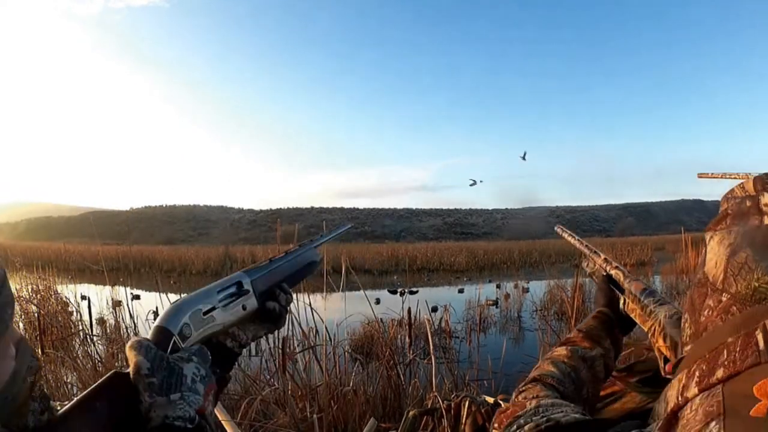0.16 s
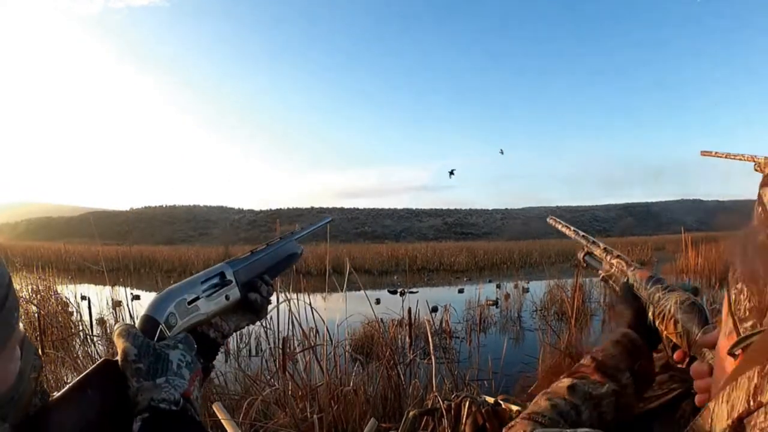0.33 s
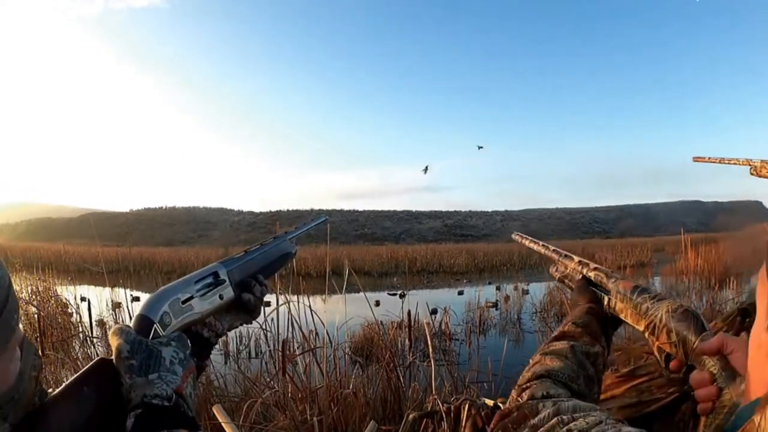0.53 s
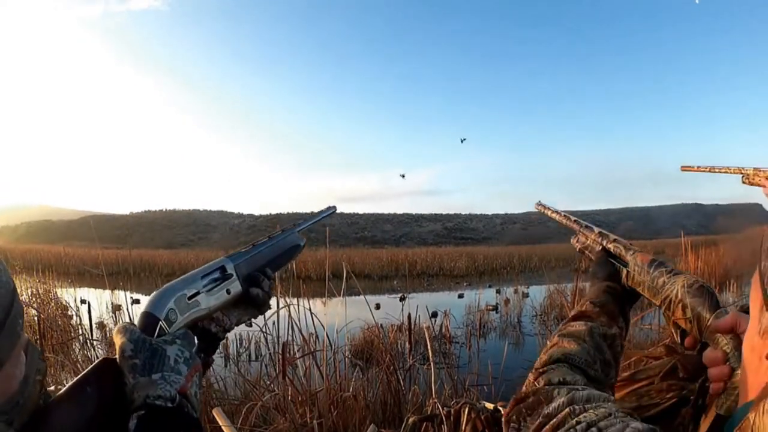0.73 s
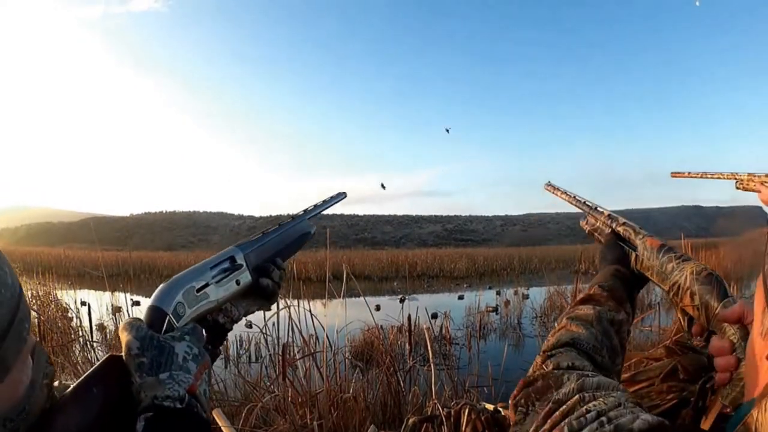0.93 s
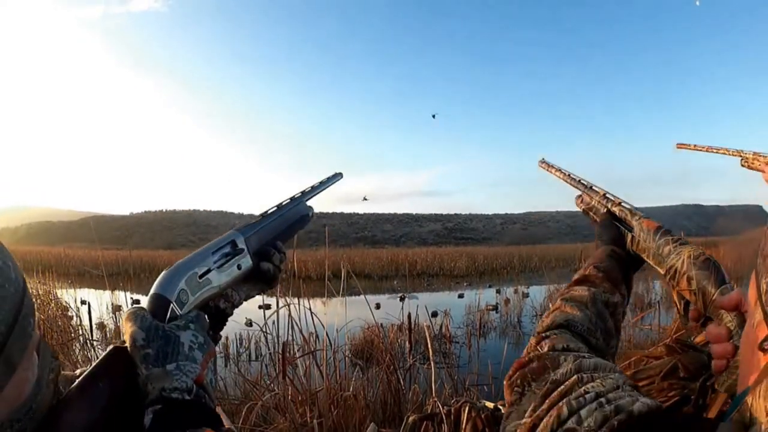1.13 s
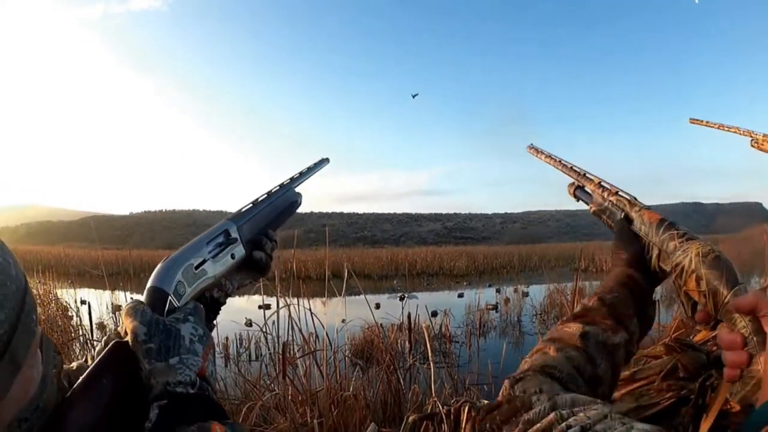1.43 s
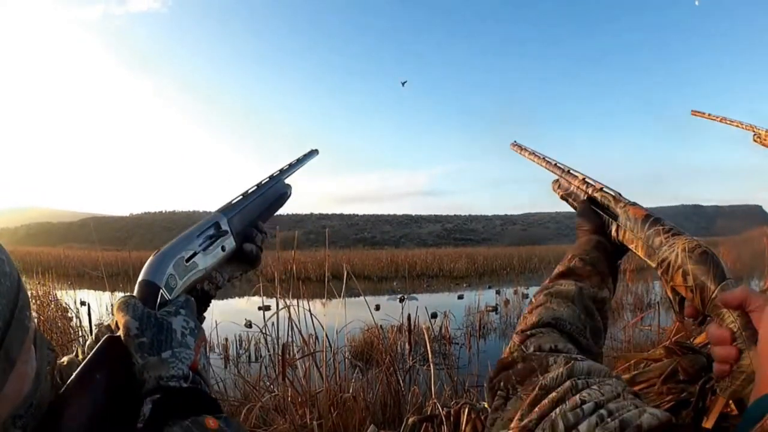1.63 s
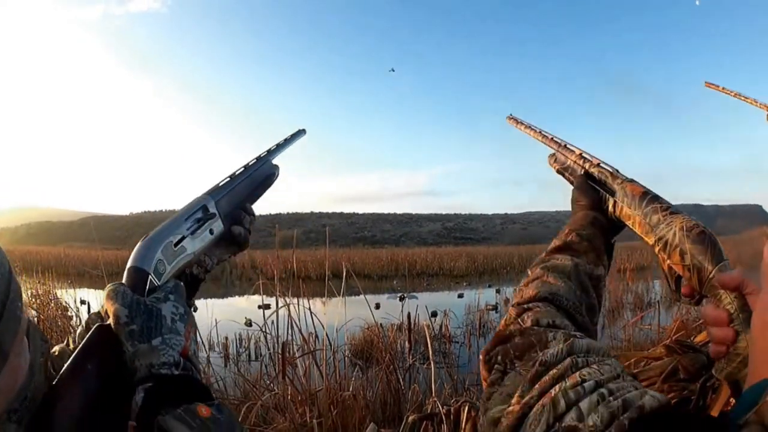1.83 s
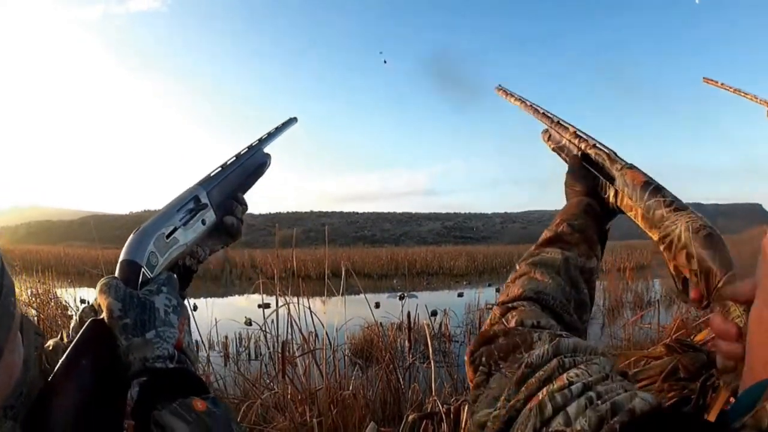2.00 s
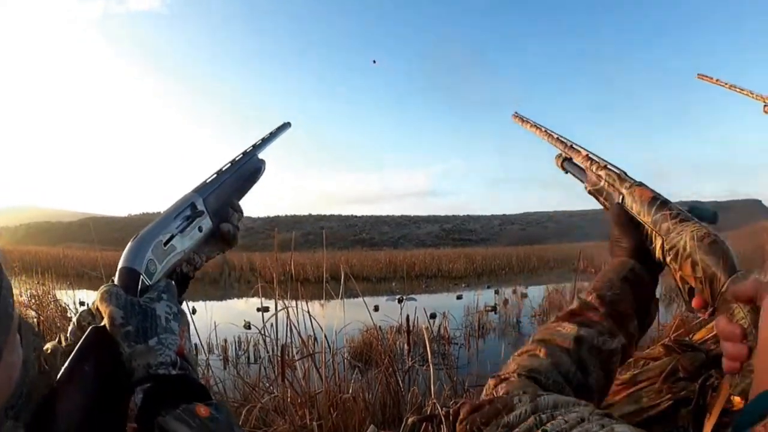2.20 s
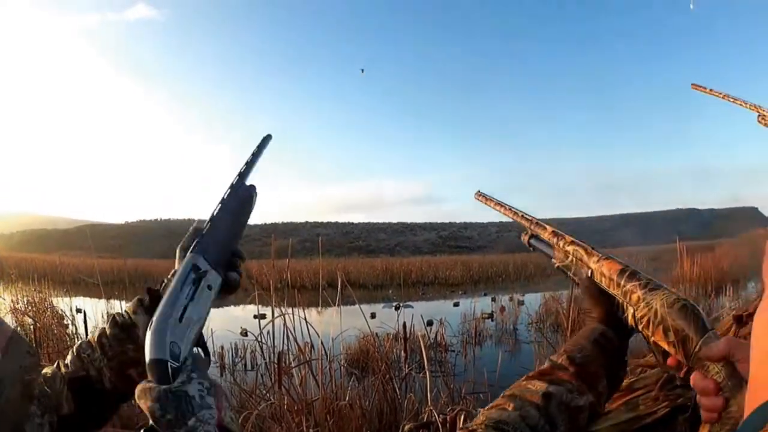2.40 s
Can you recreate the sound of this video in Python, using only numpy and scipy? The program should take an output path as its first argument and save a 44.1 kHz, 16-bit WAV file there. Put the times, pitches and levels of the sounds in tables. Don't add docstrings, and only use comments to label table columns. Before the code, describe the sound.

Loud close shotgun blasts in three bursts, metallic action clicks between, echoes rolling over open marsh

```python
import sys
import numpy as np
from scipy import signal
from scipy.io import wavfile
from scipy.ndimage import uniform_filter1d

SR = 44100
rng = np.random.default_rng(int(sys.argv[2]) if len(sys.argv) > 2 else 0)


def boost_factor(decibels):
    exponent = np.asarray(decibels, float) / 20
    return 10 ** exponent


def generate_wav(sig):
    pcm = np.round(np.clip(np.atleast_2d(sig).T, -1, 1) * 32767).astype(np.int16)
    wavfile.write(sys.argv[1], SR, pcm)


N = 112454

# f/Hz, level/dB
PORT_COLOUR = [(30, 3), (2000, 5.5), (3900, 7), (4800, 3), (5600, -9), (7000, -9.5), (8800, -6.5),
               (11000, -5.5)]
# f/Hz, left over right/dB
LEAN = [(60, -0.5), (250, 2.5), (600, 5), (1100, 5.5), (2200, 4), (3900, 16.5), (5200, -3), (9000, 5)]
# f/Hz, likeness/0..1
LIKENESS = [(60, 0.95), (140, 0.79), (340, 0.91), (800, 1), (1910, 0.43), (4530, 0.1144)]

# f/Hz, level/dB
AIR_COLOUR = [(40, 1.5), (200, 0.5), (400, -0.5), (1000, -11.5), (4000, -16), (9000, -13.5), (14000, -35)]
AIR_DB = -50.5
# t/s, slap level/dB, roll level/dB, roll rise/s, roll tilt/dB per octave
ECHOES = [
    (-.03, -48, -63, .02, 1),
    (.31, -28.5, -29.5, 0.015, 2.5),
    (0.369, -13.5, -18, 0.13, 0.5),
    (.885, -64, -42.5, 0.016, -17),
    (0.871, -62, -25.5, 0.44, 2),
    (1.351, -13.5, -19.5, 0.098, 0),
    (1.774, -24, -28, 0.17, 3.5),
    (1.881, -15.5, -23, 0.15, -7),
    (2.178, -17.5, -22, 0.14, 1),
]
# f/Hz, level/dB
ROLL_COLOUR = [(40, -58), (130, -17), (230, -7.5), (400, -2), (800, -8.5), (1700, -15.5), (4000, -13),
               (9000, -49)]
# f/Hz, time/s
ROLL_T60 = [(150, 4.2), (400, 3.54), (1000, 2.13), (4000, 1.07), (9000, 1.1)]
ROLL_PATCH_DB = 2.0
SINK_DB, SINK_FROM_HZ, SINK_TO_HZ, SINK_S, SINK_OCTAVES = 5, 1160, 277, 0.22, 0.67

# t/s, level/dB, f/Hz
HILLS = [(0.576, -16.5, 477), (.62, -23.5, 519), (.69, -16.5, 436), (0.716, -19.5, 437), (.655, -22.5, 334),
         (0.744, -24.5, 299), (.79, -22, 394), (0.829, -24, 326), (.888, -13, 317), (.889, -16, 473),
         (0.904, -25, 213), (.906, -17.5, 419), (0.92, -19.5, 364), (.935, -22, 290), (0.951, -24.5, 214),
         (.965, -20.5, 196), (0.978, -22, 324), (.985, -31, 190), (1.008, -20, 431), (2.329, -18, 500)]
HILL_RISE_S, HILL_FALL_S, HILL_WASH_DB, HILL_WASH_S = 0.003, 0.011, -11.5, 0.021

# f/Hz, level/dB
SLAP_COLOUR = [(100, -35), (300, -18.5), (800, 3), (1600, -5.5), (4000, -3), (9000, -6), (11200, -18),
               (12600, -46.5)]
# f/Hz, time/s
SLAP_T60 = [(200, 1), (1000, 0.86), (3500, 0.6), (9000, 0.3), (14000, .3)]
SLAP_HOLD_S, SLAP_RISE_S, SLAP_PATCH_DB, SLAP_FLICKER_DB = 0.026, 0.01, 1.5, 1.6

# t/s, length/s, level/dB
RATTLES = [(-.06, 0.28, -46.5), (0.423, 0.27, -31), (0.54, 0.054, -24), (0.545, 0.23, -46),
           (1.467, 0.13, -30.5), (1.548, 0.052, -17), (1.574, 0.046, -39), (1.93, 0.3, -43.5),
           (2.241, 0.038, -22.5), (2.276, 0.23, -45.5), (2.372, 0.24, -43.5)]
# f/Hz, level/dB
RATTLE_COLOUR = [(300, -7), (1500, -6.5), (4000, 3.5), (6500, 1.5), (9000, 5), (10800, -4), (12000, -39)]
RATTLE_GRAIN_DB = 2.5

# t/s, level/dB, top-octave level/dB
TICKS = [(.2775, -10.5, 1), (.528, -22, -22), (1.2785, -9.5, -0.5), (1.3595, -18, -20),
         (1.3875, -10.5, -15), (1.463, -28, -20), (1.545, -16, -19), (1.5565, -11, 0.5), (1.565, -15, 5.5),
         (1.5725, -12.5, 3.5), (2.083, -17, -2.5), (2.2205, -19, -20), (2.2455, -20, -19),
         (2.2585, -1.5, 1), (2.285, -35, -20)]
# f/Hz, level/dB
TICK_COLOUR = [(800, -16.5), (2500, -4), (4000, 5.5), (9000, 7.5), (12000, 3)]
# f/Hz, level/dB
TICK_TOP = [(13000, -7), (15000, -19.5), (19000, -16.5)]
TICK_S, TICK_RING_HZ, TICK_RING_DB, TICK_RING_S = 0.0015, 8300, -22, 0.003

# t/s, ring level/dB, ring f/Hz, snap level/dB
CLICKS = [(0.304, 3, 3860, -8.5), (0.326, 5, 2700, -17), (.392, -6, 3730, -14), (0.417, -4, 3730, -14.5),
          (.552, -9.5, 4000, -12), (.560, -15.5, 3500, -13.5), (1.278, 6.5, 3050, -4),
          (1.29, -2, 3910, -21), (1.371, -3, 3940, -10), (1.388, -1.5, 4180, -4.5), (1.410, -5, 3850, -9.5),
          (1.478, -32, 3970, -23), (1.497, -29, 4100, -13), (1.529, -26, 1990, -22),
          (1.558, -21, 3370, -13), (1.5646, -5, 1810, -5), (1.573, 0.5, 1710, -5), (1.665, -6.5, 4130, -27),
          (1.675, -2, 3800, -16), (1.692, 6.5, 3300, -4), (1.715, -7, 1380, -30), (1.809, 0, 3570, -13.5),
          (2.076, -5, 4000, -20), (2.080, 3, 3940, -5), (2.084, -2, 4080, -20), (2.092, -22, 4000, -22),
          (2.1052, -0.5, 3220, -14), (2.171, -7.5, 1460, -27), (2.199, -4, 3740, -27.5),
          (2.21, -9, 3870, -18), (2.2579, -1.5, 3960, -7), (2.2598, -1.5, 2820, -18)]
# f/Hz, level/dB, fade by 60 dB/s
ACTION_MODES = [(1410, -25, 0.022), (2920, -18, 0.014), (4060, -27.5, 0.0081), (8700, -41.5, .025)]
# f/Hz, level/dB
SNAP_COLOUR = [(300, -3.5), (1500, 8), (4000, -3), (9000, 9), (11500, -5), (13000, -38)]
SNAP_S, SNAP_TAIL_DB, SNAP_TAIL_S = 0.0017, -19, 0.0041
CLICK_T60_S, CLICK_RISE_S, RING_SPREAD = 0.012, 0.00072, 0.13

# t/s, level/dB, f/Hz, decay/s, push level/dB
BOOMS = [
    (0.231, -2.5, 156.2, 0.026, -9.5),
    (0.2543, 3, 203, 0.0069, -8.5),
    (0.283, -1, 174.4, 0.0055, -0.5),
    (1.2307, -0.5, 178, 0.013, -3.5),
    (1.6408, 12, 166.2, 0.0087, 1),
    (1.758, 2, 188.8, 0.0077, 5),
    (2.0591, -1.5, 174.8, 0.0083, -35.5),
    (0.307, -20.5, 159, 0.014, -3.5),
]
BOOM_GLIDE, BOOM_GLIDE_S, BOOM_ROUGH_DB, BOOM_LIKENESS = 0.934, 0.0034, -6.5, 0.82
BOOM_UPPER, BOOM_UPPER_DB = 1.625, -3
BOOM_LOWER, BOOM_LOWER_DB = 0.69, -5
PUSH_S, KNOCK_HZ, KNOCK_DB, KNOCK_S = 0.018, 682, -8.5, 0.0059

# t/s, level/dB, hold/s, hiss level/dB, rise/s
CRACKS = [
    (0.223, 4.5, 0.011, -1, 0.0015),
    (0.256, 0, 0.0027, -6, 0.00062),
    (0.277, -2, 0.0034, -5, 0.00084),
    (1.223, 3.5, 0.0084, -2.5, 0.0027),
    (1.6413, 3, 0.0081, -2.5, .0005),
    (1.757, 5, 0.002, -5.5, 0.0017),
    (2.047, 1.5, 0.013, -5.5, 0.0016),
]
# f/Hz, level/dB
CRACK_COLOUR = [(100, -12), (700, 3.5), (2000, 1), (5000, 4), (9000, 6.5), (14500, -6.5), (17000, -10.5)]
# f/Hz, level/dB
HISS_COLOUR = [(100, 4), (300, -3.5), (1000, -2.5), (2500, -3.5), (4000, -2), (9000, -1), (11500, -17),
               (14000, -47)]
PRE_ROLL_S, LEAD_DB, LEAD_S, CRACK_FALL_S = 0.01, -22.5, 0.004, 0.0044
HISS_RISE_S, HISS_FALL_S, HISS_LUMP_DB = 0.00528, 0.04, 2.5


def evened(x):
    return x / np.sqrt(np.mean(x ** 2) + 1e-20)


def read(points, hz):
    f, value = np.transpose(points)
    return np.interp(np.log(hz + 1), np.log(f + 1), value)


def add(mix, s, sound):
    part = mix[..., round(s * SR):][..., :sound.shape[-1]]
    part += sound[..., :part.shape[-1]]


def pan(left_db, right_db):
    return boost_factor(np.array([[left_db], [right_db]]))


def lumps(frames, size, count):
    noise = rng.standard_normal((frames, size)).T
    across_bins = uniform_filter1d(noise, size=6, axis=0)
    return evened(uniform_filter1d(across_bins, size=count, axis=1))


def shape(points, size=256):
    hz = np.fft.rfftfreq(size, 1 / SR)
    colour = boost_factor(read(points, hz) + read(PORT_COLOUR, hz)) * (hz > 0)
    return evened(colour)[:, None] / np.sqrt(size)


def ports(size, count):
    order = 2 * len(size) - 2
    hz = np.fft.rfftfreq(order, 1 / SR)
    a, b, c, d = rng.standard_normal((size.shape[1], len(hz), 4)).T
    same = np.clip(read(LIKENESS, hz), -1, 1)[:, None]
    lean = boost_factor(read(LEAN, hz)[:, None] / 2)
    shared, own = a + 1j * b, c + 1j * d
    z = np.array([shared * lean, (same * shared + np.sqrt(1 - same ** 2) * own) / lean])
    return signal.istft(z * size, nperseg=order, noverlap=order - order // 4)[1][:, :count]


def band(x, order, low_hz, high_hz):
    return signal.sosfilt(signal.butter(order, [low_hz, high_hz], "band", fs=SR, output="sos"), x)


def thud(count, low_hz, high_hz):
    a, b = rng.standard_normal((count, 2)).T
    right = BOOM_LIKENESS * a + np.sqrt(1 - BOOM_LIKENESS ** 2) * b
    return evened(band(np.array([a, right]), 2, low_hz, high_hz))


def marsh():
    frames, hz = N // 256 + 5, np.fft.rfftfreq(1024, 1 / SR)[:, None]
    t = np.arange(frames) * 256 / SR
    power = (boost_factor(AIR_DB) * shape(AIR_COLOUR, size=1024)) ** 2 * np.ones(frames)
    for s, _, roll_db, rise, tilt_db in ECHOES:
        u = np.maximum(t - s, 0)
        colour = shape(ROLL_COLOUR, size=1024) * boost_factor(tilt_db * np.log2(np.maximum(hz, 60) / 400))
        centre = SINK_TO_HZ + (SINK_FROM_HZ - SINK_TO_HZ) * np.exp(-u / SINK_S)
        hump = np.exp(-(np.log2((hz + 1) / centre) / SINK_OCTAVES) ** 2)
        fade = (1 - np.exp(-u / rise)) * boost_factor(roll_db - 60 * u / read(ROLL_T60, hz))
        power = power + (colour * boost_factor(SINK_DB * hump) * fade) ** 2
    patches = boost_factor(ROLL_PATCH_DB * lumps(frames, size=513, count=4))
    return ports(np.sqrt(power) * patches, count=N)


def hills():
    out, t = np.zeros((2, N)), np.arange(8000) / SR
    for s, db, hz in HILLS:
        wash = thud(count=len(t), low_hz=118, high_hz=500) * np.exp(-t / HILL_WASH_S)
        ring = np.sin(2 * np.pi * hz * t) * np.exp(-t / HILL_FALL_S)
        rise = 1 - np.exp(-t / HILL_RISE_S)
        add(out, s, boost_factor(db) * rise * (ring + boost_factor(HILL_WASH_DB) * wash) * pan(3, -2.5))
    return band(out, 4, 120, 1200)


def slaps():
    frames, hz = N // 64 + 5, np.fft.rfftfreq(256, 1 / SR)[:, None]
    t, power = np.arange(frames) * 64 / SR, 0
    for s, slap_db, *_ in ECHOES:
        u = np.maximum(t - s, 0)
        rise = np.minimum(u / SLAP_RISE_S, 1)
        fade_db = -60 * np.maximum(u - SLAP_HOLD_S, 0) / read(SLAP_T60, hz)
        power = power + (shape(SLAP_COLOUR) * rise * boost_factor(slap_db + fade_db)) ** 2
    flicker_db = SLAP_FLICKER_DB * evened(uniform_filter1d(rng.standard_normal(frames), size=5))
    patch_db = SLAP_PATCH_DB * lumps(frames, size=129, count=10)
    return ports(np.sqrt(power) * boost_factor(patch_db + flicker_db), count=N)


def rattles():
    frames = N // 64 + 5
    t, power = np.arange(frames) * 64 / SR, 0
    for s, length, db in RATTLES:
        progress = np.clip((t - s) / length, 0, 1)
        swell = np.sin(np.pi * progress ** 0.48) ** 2
        power = power + (boost_factor(db) * swell) ** 2
    grain = evened(uniform_filter1d(rng.standard_normal(frames), size=3))
    return ports(shape(RATTLE_COLOUR) * np.sqrt(power) * boost_factor(RATTLE_GRAIN_DB * grain), count=N)


def ticks():
    out, t = np.zeros((2, N)), np.arange(800) / SR
    ring = boost_factor(TICK_RING_DB) * np.exp(-t / TICK_RING_S) * np.sin(2 * np.pi * TICK_RING_HZ * t)
    for s, db, top_db in TICKS:
        colour = list(TICK_COLOUR) + [(hz, level_db + top_db) for hz, level_db in TICK_TOP]
        edge = np.exp(-t / TICK_S) * ports(shape(colour) * np.ones(18), count=len(t))
        add(out, s, boost_factor(db) * np.minimum(t / 0.0004, 1) * (edge + ring))
    return out


def clicks():
    out, t = np.zeros((2, N)), np.arange(3000) / SR
    weights = np.array([[0.4], [0.7], [0.4]])
    snap_fall = np.exp(-t / SNAP_S) + boost_factor(SNAP_TAIL_DB) * np.exp(-t / SNAP_TAIL_S)
    for s, db, hz, snap_db in CLICKS:
        cluster = hz * (1 + RING_SPREAD * np.array([[-1], [0], [1]]))
        tones = np.sin(2 * np.pi * (cluster * t + rng.random((3, 1))))
        ring = boost_factor(-60 * t / CLICK_T60_S) * (weights * tones).sum(0)
        for f, level_db, t60 in ACTION_MODES:
            detune, phase = rng.random(2)
            mode = np.sin(2 * np.pi * (f * (0.87 + 0.2 * detune) * t + phase))
            ring = ring + boost_factor(level_db - 60 * t / t60) * mode
        snap = boost_factor(snap_db) * snap_fall * ports(shape(SNAP_COLOUR) * np.ones(52), count=len(t))
        strike = boost_factor(db) * pan(3, -7) * ring + 2 * snap
        add(out, s, strike * (1 - np.exp(-t / CLICK_RISE_S)))
    return out


def booms():
    out, t = np.zeros((2, N)), np.arange(6000) / SR
    knock = boost_factor(KNOCK_DB) * np.exp(-t / KNOCK_S) * np.sin(2 * np.pi * KNOCK_HZ * t)
    for s, db, hz, fall, push_db in BOOMS:
        phase = 2 * np.pi * np.cumsum(hz * (1 + BOOM_GLIDE * np.exp(-t / BOOM_GLIDE_S))) / SR
        push = boost_factor(push_db) * pan(0, -9) * (1 - t / PUSH_S) * np.exp(-t / PUSH_S)
        ring = np.sin(phase)
        ring = ring + boost_factor(BOOM_UPPER_DB) * np.sin(BOOM_UPPER * phase)
        ring = ring + boost_factor(BOOM_LOWER_DB) * np.sin(BOOM_LOWER * phase)
        rough = boost_factor(BOOM_ROUGH_DB) * thud(count=len(t), low_hz=71.2, high_hz=403)
        blast = push - (ring + rough) * np.exp(-t / fall) - knock
        add(out, s, boost_factor(db) * blast * np.minimum(t / 0.002, 1))
    return out * pan(4, 0)


def cracks():
    out, t, flat = np.zeros((2, N)), np.arange(13000) / SR, np.ones(13000 // 64 + 5)
    u = t - PRE_ROLL_S
    before = np.minimum(u, 0)
    lead = boost_factor(LEAD_DB) * np.exp(before / LEAD_S) * np.minimum(t / LEAD_S, 1)
    hiss_fade = np.exp(-u / HISS_FALL_S) * (1 - np.exp(-t / HISS_RISE_S))
    for s, db, hold, hiss_db, rise_s in CRACKS:
        rise = np.maximum(np.exp(before / rise_s), lead)
        burst_fade = np.exp(-np.maximum(u - hold, 0) / CRACK_FALL_S)
        burst = boost_factor(db) * burst_fade * ports(shape(CRACK_COLOUR) * flat, count=len(t))
        lumpy = boost_factor(HISS_LUMP_DB * lumps(len(flat), size=129, count=5))
        hiss = boost_factor(hiss_db) * hiss_fade * ports(shape(HISS_COLOUR) * lumpy, count=len(t))
        add(out, s - PRE_ROLL_S, rise * (burst * pan(0, 3) + hiss * pan(0, -1)))
    return out


def scene():
    return marsh() + hills() + slaps() + rattles() + ticks() + clicks() + booms() + cracks()


def band_limit(x):
    return signal.sosfilt(signal.butter(12, 16000, fs=SR, output="sos"), x)


def record(dry):
    x = signal.sosfilt(signal.butter(1, 122, "high", fs=SR, output="sos"), dry)
    ceiling, knee = 1.0, 30.0
    x = x / (1 + abs(x / ceiling) ** knee) ** (1 / knee)
    return band_limit(x)


dry = scene()
out = record(dry)
generate_wav(out)
```